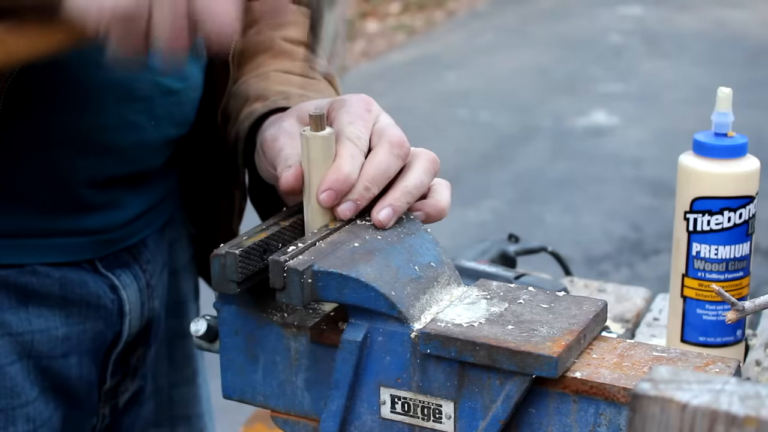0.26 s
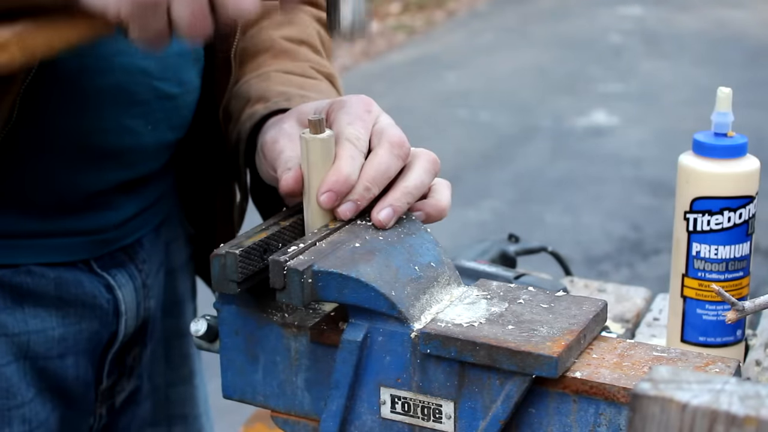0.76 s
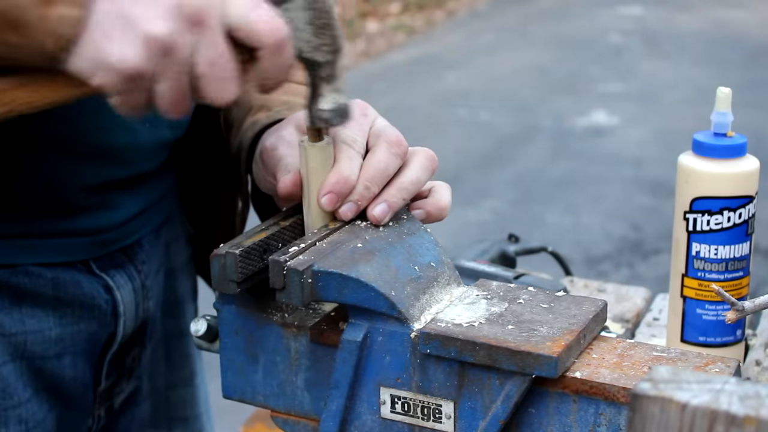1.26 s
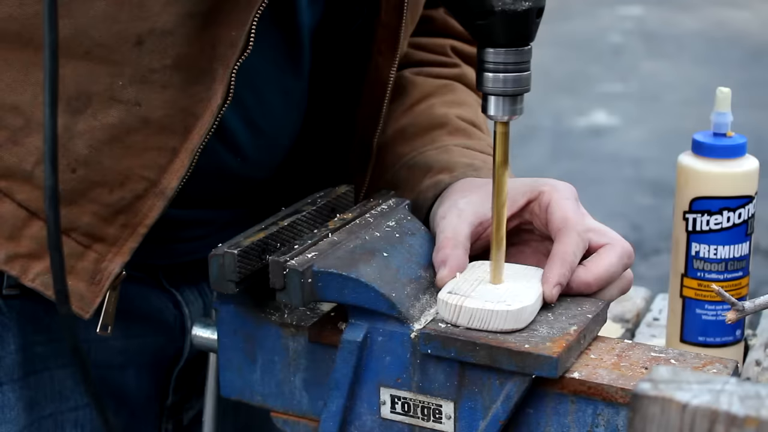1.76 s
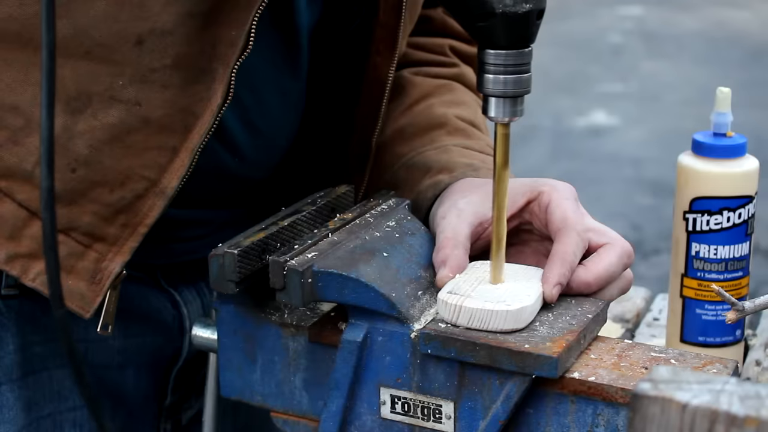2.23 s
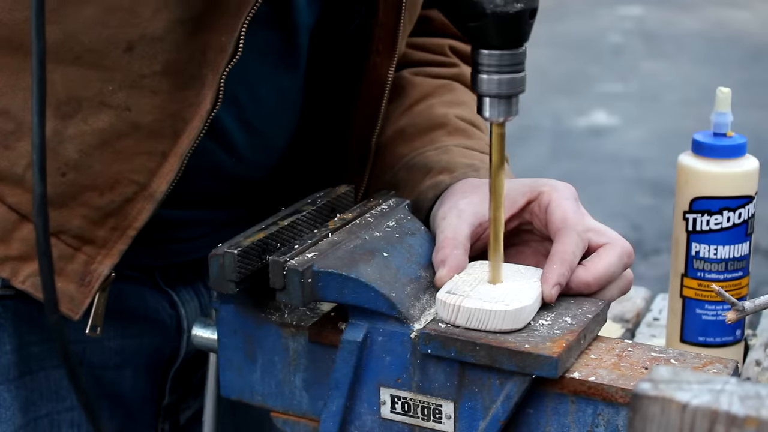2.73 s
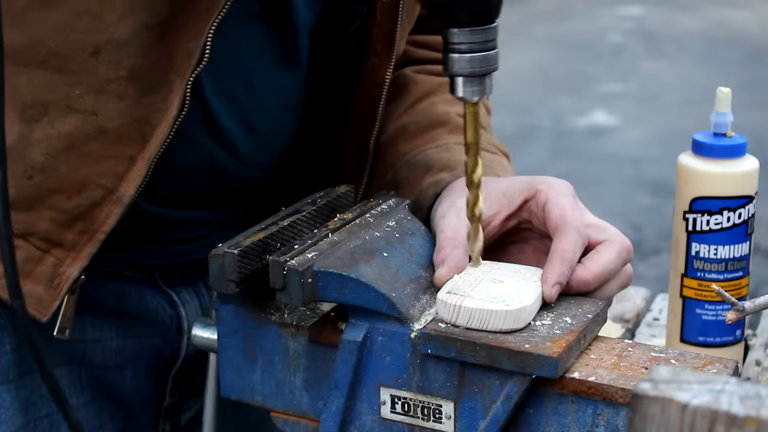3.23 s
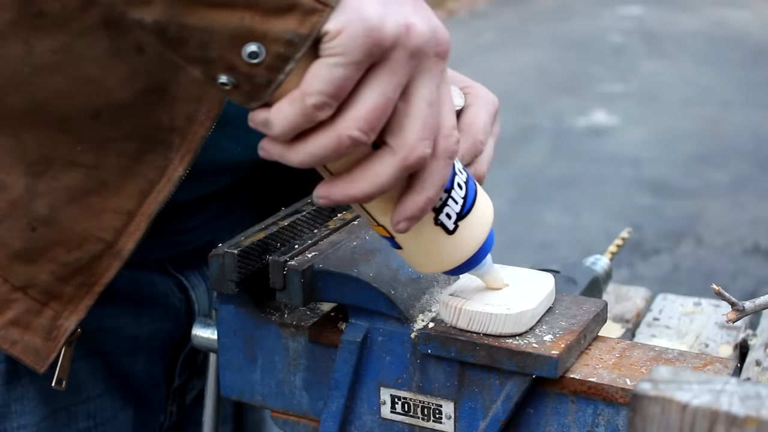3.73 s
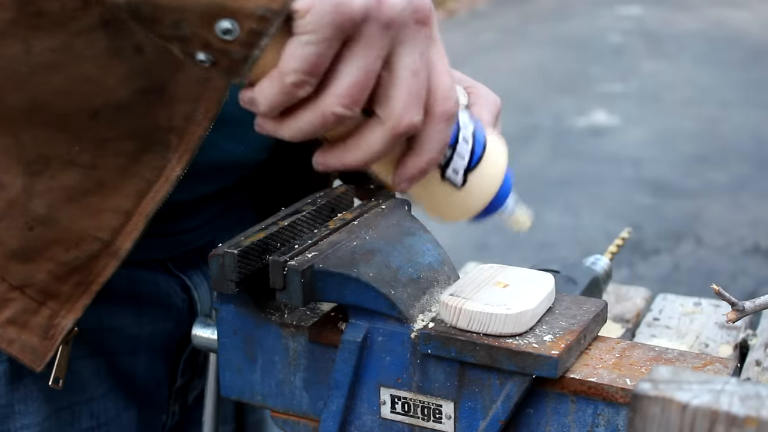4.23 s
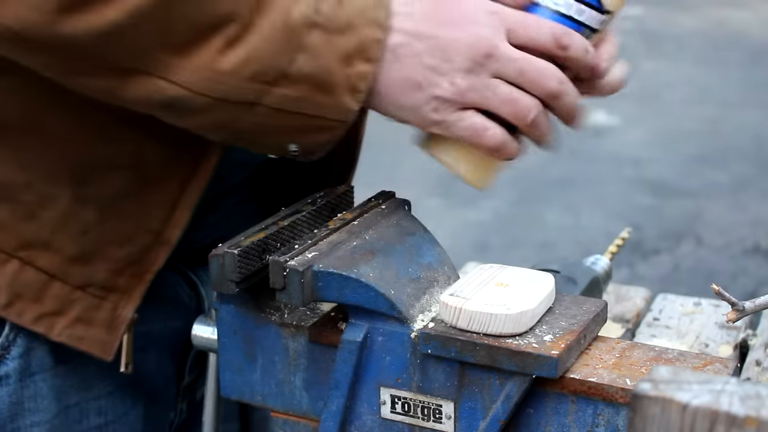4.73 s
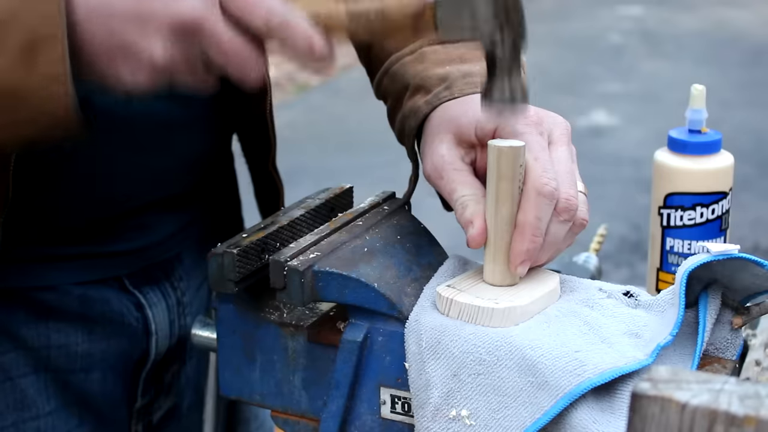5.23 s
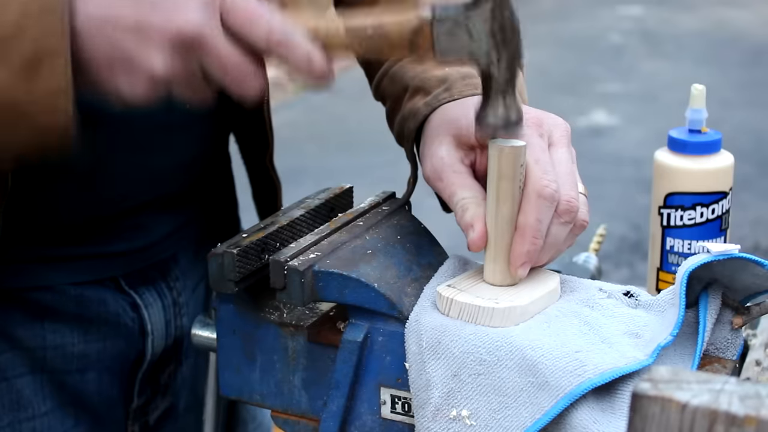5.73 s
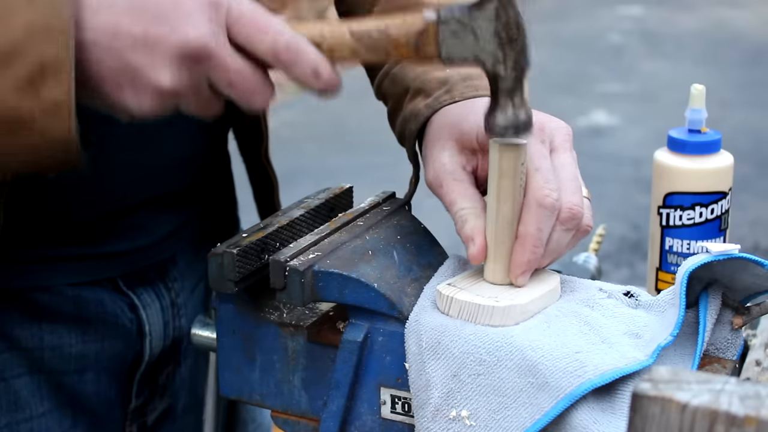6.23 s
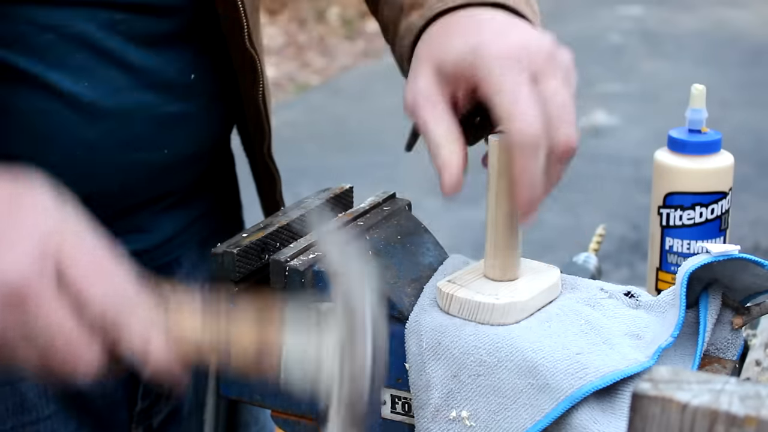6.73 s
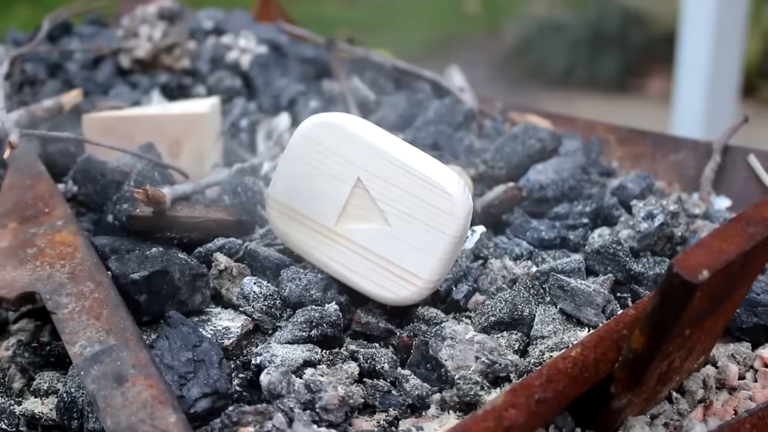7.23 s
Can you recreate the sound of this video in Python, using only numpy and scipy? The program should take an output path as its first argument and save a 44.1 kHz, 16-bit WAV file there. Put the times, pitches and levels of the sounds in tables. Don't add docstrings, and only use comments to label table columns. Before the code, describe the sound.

Outdoor workbench: six crisp hammer taps, an electric drill slowing to a stop, quiet glue handling, five woody blows, then a torch igniting and hissing.

```python
import sys
import numpy as np
from scipy import signal
from scipy.fft import rfft, irfft, next_fast_len
from scipy.io import wavfile
from scipy.ndimage import uniform_filter1d, map_coordinates

SR = 44100
rng = np.random.default_rng(int(sys.argv[2]) if len(sys.argv) > 2 else 0)


def voltage_ratio(decibels):
    exponent = np.asarray(decibels, float) / 20
    return 10 ** exponent


def log_audio(samples):
    frames = np.atleast_2d(samples).T
    limited = np.clip(frames, -1, 1)
    pcm = np.round(limited * 32767).astype(np.int16)
    wavfile.write(sys.argv[1], SR, pcm)


N = 329427

# freq_hz, density_db
TRAFFIC_SPECTRUM = [(59, -38.5), (100, -2), (178, -2.5), (510, -13), (714, -17.5), (935, -22),
                    (2500, -37.5), (3250, -69.5), (5500, -120)]
LEAF_SPECTRUM = [(290, -26.5), (500, -7.5), (925, -4.5), (1610, -3), (1990, -5.5), (3350, -1.5),
                 (4280, -12.5), (8000, -22.5), (10400, -31), (17600, -120)]
HISS_SPECTRUM = [(2350, -38), (4000, -5.5), (6100, -8), (6920, -8), (7510, -5.5), (14800, -7.5),
                 (15900, -9)]
WIND_SPECTRUM = [(12, -36), (20, -7), (43, -4), (86, -8), (120, -4.5), (160, -19), (260, -120)]
PIN_CLATTER = [(180, -20), (300, -17), (1830, -13), (2170, 1), (2470, -9), (3120, -8.5), (3450, -3.5),
               (12600, -40), (15900, -70.5)]
DOWEL_CLATTER = [(88, -39), (150, -3), (264, 2.5), (611, -19), (1210, -9.5), (1690, -16.5), (1970, -14),
                 (3030, -8), (15900, -42.5)]
GROWL_SPECTRUM = [(35, -74), (60, -30), (190, -21), (304, -15), (921, -10), (1950, -4.5), (2140, -11.5),
                  (2500, 1), (3250, -38), (5500, -120)]
RASP_SPECTRUM = [(710, -51), (1200, -17.5), (1940, -2), (2340, -14.5), (2780, -5), (3060, -2), (3670, -6),
                 (5140, -22), (6000, -15.5), (13200, -120)]
FAN_SPECTRUM = [(2650, -22), (4500, -8), (6150, -8.5), (6760, 3), (7010, -2), (7350, -7.5), (8440, -6),
                (10100, -12), (11100, -6.5), (12100, -16), (14300, -15), (15900, -31)]
FLAME_SPECTRUM = [(15, -38), (25, -18), (92, -9), (284, -7), (372, -17.5), (438, -18), (900, -23),
                  (1170, -59), (1980, -120)]
NOZZLE_SPECTRUM = [(290, -19), (500, -12.5), (1110, -12.5), (2170, -4.5), (2750, 0.5), (3080, -0.5),
                   (4630, -9), (6000, -30), (13200, -120)]
JET_SPECTRUM = [(2650, -33), (4500, -14), (5550, -7.5), (8000, -3.5), (8550, 1), (9150, -4), (11600, -4),
                (12500, -2.5), (14700, -4), (15800, -3)]
# freq_hz, side_minus_mid_db
PORTS = [(60, -38), (200, -52), (700, -45.5), (2380, -44), (8120, -34), (15000, -27)]

# start_s, end_s
TAKE_SPANS = [(0, 1.737), (3.36, 3.604), (3.606, 5.14), (5.142, 6.842)]
# traffic_db, leaves_db, hiss_db
TAKE_LEVELS = [
    (-50.5, -52.5, -63.5),
    (-58, -56.5, -69.5),
    (-50.5, -63.5, -66.5),
    (-56, -50.5, -68.5),
]
# time_s, level_db
BREEZE = [
    (0.0, -61),
    (1.56, -59),
    (1.8, -71),
    (2.93, -55.5),
    (3.4, -67),
    (3.8, -50.5),
    (5.16, -68),
    (7.47, -64),
]
# time_s, effort_db
HANDS = [
    (3.606, -61.5),
    (4.25, -59.5),
    (4.5, -51.5),
    (4.64, -55),
    (4.8, -49.5),
    (4.85, -53.5),
    (4.875, -45.5),
    (5.05, -45),
    (5.138, -50),
]
# traffic_db, leaves_db, hiss_db
EFFORT_GROWTH = (0.15, 1.13, .5)
# time_s, level_db
SLEEVE = [
    (4.402, -62),
    (4.706, -53.5),
    (4.81, -51.5),
]

# start_s, peak_db, thud_db, slap_hz, ring_db
PIN_BLOWS = [(0.025, -4.5, -24, 3366, 5.5), (0.311, -27.5, -13, 2920, 9.5), (0.348, -3.5, -28, 1675, 0.5),
             (0.62, -25, -12, 2860, 9), (0.659, -4.5, -24, 3295, 4.5), (0.942, -29, -11, 2920, 9),
             (0.986, -2.5, -28.5, 1820, 2.5), (1.267, -24, -20, 2900, 7.5), (1.275, -26, -11, 3020, -4),
             (1.286, -7, -27.5, 2810, 5), (1.323, -31.5, 2, 1550, 4), (1.576, -25, -14, 2980, 10.5),
             (1.598, -2.5, -38, 1750, -1), (1.634, -27.5, 2.5, 2800, -6)]
DOWEL_BLOWS = [(5.221, -3.5, -22.5, 1880, -2), (5.475, -0.5, -17, 1810, -5), (5.538, -29, -1, 1350, 9),
               (5.591, -30.5, -8, 940, 4), (5.727, -3, -17, 1060, 5), (5.763, -21, -8, 1510, 0),
               (5.813, -26, -3, 1305, 13), (5.986, -2.5, -26, 1595, 2), (6.019, -28.5, -4, 2350, -4),
               (6.046, -37, 3, 1340, 5), (6.071, -31, -6.5, 1355, 14), (6.227, -2, -21, 1060, 4),
               (6.281, -19, -16.5, 1160, -13), (6.314, -33, 1, 616, 14)]
CLICKS = [
    (4.454, -35, -31, 2880, 6),
    (4.701, -26, -15.5, 1500, 0),
    (6.915, -24.5, -20, 1120, 4),
]
# freq_hz, level_db, t60_s
PIN_MODES = [(1154, -16, 0.052), (1580, -20, 0.05), (1880, -29, 0.066), (2500, -7, 0.053),
             (2825, 20, 0.0035), (3480, -5, 0.021), (3530, -25, 0.045), (4160, -22, 0.075),
             (5610, -36, 5.0), (8260, -36.5, 0.08)]
DOWEL_MODES = [(1060, -10.5, 0.3), (1335, 3, 0.046), (1810, 10.5, 0.016), (2350, -3.5, 0.076),
               (2900, -22, 0.028), (3546, -40, 0.026), (5250, -11, 0.021)]
BENCH_MODES = [(134.2, -6.5, 0.16), (285, -21, 0.19), (370, -1.5, 0.074), (455, 3, 0.035),
               (600.3, -2.5, 0.14)]
# freq_hz, t60_s
PIN_DECAY = [(200, 0.16), (1000, 0.043), (3000, 0.029), (8000, 0.012), (15000, 0.0069)]
DOWEL_DECAY = [(200, 0.097), (1000, 0.14), (3000, 0.037), (8000, 0.015), (15000, 0.0058)]
# blow_s, level_db
HEAD_RING = [(.024, -48.5), (.348, -44.5), (.659, -50.5), (.986, -43.5), (1.284, -41), (1.597, -43.5),
             (5.221, -50), (5.476, -51), (5.727, -57.5), (5.985, -43), (6.227, -59.5)]
CLAW_DB = [-21.5, -24, -31, -24, -31, -33]

# time_s, lowest_hz, level_db
TRILL = [
    (1.335, 7500, -57),
    (1.36, 7200, -57.5),
    (1.39, 7050, -48),
    (1.43, 7230, -50),
    (1.47, 7100, -59),
    (1.54, 7100, -69),
]
# time_s, pitch_hz, level_db
CHIP = [
    (3.458, 4530, -68),
    (3.476, 4470, -41),
    (3.488, 4550, -57),
]
INSECTS_DB = (-58.5, -67, -65)
# start_s, end_s
DRONE_S = (3.41, 3.604)

# time_s, turns_per_s, load_db
SHAFT = [(1.739, 207, -4.5), (1.805, 215, -5), (1.95, 232, -2.5), (2.13, 242.5, -1.5), (2.33, 248.5, -1.5),
         (2.57, 249.5, -0.5), (2.62, 242, -2), (2.74, 198, -2.5), (2.86, 170, -4), (3.02, 126, -3),
         (3.18, 81, -2.5), (3.24, 66, -3), (3.3, 55, -2), (3.35, 31, -5.5), (3.44, 12, -13.5)]
# freq_hz, width_hz, level_db
CASING = [(1910, 140, -14), (3040, 110, 10), (6840, 870, -13), (8350, 1300, -7.5)]

# time_s, flow_db
GAS = [
    (6.844, -21),
    (6.86, -7.5),
    (6.904, -17),
    (6.932, -4.5),
    (6.956, 5.5),
    (6.98, 0),
    (7.16, -3),
    (7.26, -4.5),
    (7.35, -1.5),
    (7.47, -2),
]
# time_s, pitch_hz, level_db
POP = [
    (6.844, 283, -38),
    (6.87, 282.5, -33.5),
    (6.97, 276, -45),
]

TOP_HZ = 15950
HARD_DB = -10


def unit(x):
    return x / np.sqrt(np.mean(x ** 2) + 1e-20)


def since(s):
    return np.arange(N) / SR - s


def along(points, hz):
    f, v = np.transpose(points)
    return np.interp(np.log(hz + 1), np.log(f + 1), v)


def curves(*tables):
    t = since(0)
    s, *cols = np.concatenate(tables).T
    gate = sum((t >= rows[0][0]) & (t < rows[-1][0]) for rows in tables)
    smooth_gate = uniform_filter1d(np.minimum(gate, 1.), size=90)
    return [np.interp(t, s, c) for c in cols] + [smooth_gate]


def wobble(rate_hz):
    knots = rng.standard_normal(int(N * rate_hz / SR) + 4)
    return map_coordinates(knots, [np.arange(N) * rate_hz / SR])


def filtered(x, gain):
    m = next_fast_len(N + 8192)
    return irfft(rfft(x, m) * gain(np.fft.rfftfreq(m, 1 / SR)), m)[:N]


def rush(spectrum, patchy_db, beat=1):
    z = signal.stft(rng.standard_normal(N) * beat, nperseg=512)[2]
    field = uniform_filter1d(rng.standard_normal(z.shape), size=6, axis=0)
    field = uniform_filter1d(field, size=10, axis=1)
    x = signal.istft(z * voltage_ratio(patchy_db * unit(field)), nperseg=512)[1][:N]
    return unit(filtered(x, lambda hz: voltage_ratio(along(spectrum, hz)) * np.clip((TOP_HZ - hz) / 250, 0, 1)))


def tone(hz, db, blur=0.):
    phase = 2 * np.pi * np.cumsum(hz) / SR
    return np.sqrt(2) * voltage_ratio(db) * np.sin(phase + blur * wobble(60))


def breeze():
    level_db = curves(BREEZE)[0] + 1.7 * wobble(6.3)
    return voltage_ratio(level_db) * rush(WIND_SPECTRUM, patchy_db=3.0)


def yard():
    open_db, hold_s, close_s = (6.5, 3.5, -3), 0.17, 0.058
    swing_db, swing_delay_s, swing_width_s = (0.5, 1.5, 4.5), (0.17, 0.16), 0.022
    calm_s, calm_db_per_s = 6.64, 45
    spans = [[(a, *db), (b, *db)] for (a, b), db in zip(TAKE_SPANS, TAKE_LEVELS)]
    *still_db, gate = curves(*spans)
    effort_db, handling = curves(HANDS)
    stir_db = handling * (effort_db - min(db for s, db in HANDS))
    stir_db = stir_db - calm_db_per_s * np.maximum(since(calm_s), 0)

    taps = [row[0] for row in PIN_BLOWS if row[1] > HARD_DB]
    drives = [row[0] for row in DOWEL_BLOWS if row[1] > HARD_DB]
    lift = np.max([(since(s) > 0) * np.clip(1 - (since(s) - hold_s) / close_s, 0, 1) for s in taps], axis=0)
    swish = sum(np.exp(-(since(s + delay) / swing_width_s) ** 2 / 2)
                for hits, delay in zip((taps, drives), swing_delay_s) for s in hits)

    traffic_db, leaves_db, hiss_db = (
        db + growth * stir_db + opening * lift + swing * swish
        for db, growth, opening, swing in zip(still_db, EFFORT_GROWTH, open_db, swing_db))
    traffic = voltage_ratio(traffic_db + wobble(16) / 2) * rush(TRAFFIC_SPECTRUM, patchy_db=0.5)
    leaves = voltage_ratio(leaves_db + 0.88 * wobble(8.6)) * rush(LEAF_SPECTRUM, patchy_db=1.6)
    hiss = voltage_ratio(hiss_db + 0.6 * wobble(4.9)) * rush(HISS_SPECTRUM, patchy_db=0.8)
    return gate * (traffic + leaves + hiss)


def ringing(modes, t):
    longest_s, detune, scatter_db = 0.26, 0.008, 2.5
    out = 0
    for hz, db, t60_s in modes:
        envelope = voltage_ratio(db + rng.normal(0, scatter_db) - 60 * t / min(t60_s, longest_s))
        out = out + envelope * np.sin(2 * np.pi * hz * rng.normal(1, detune) * t)
    return out


def blows(events, modes, colour, decay, slap_db, ring_db, clatter_db, thud_db, crack_db, bright):
    out, t = np.zeros(N + SR), np.arange(SR // 4) / SR
    contact = np.exp(-(t / 0.0017) ** 4)
    next_s = [row[0] for row in events[1:]] + [N]
    for (s, peak_db, low_db, slap_hz, mode_db), lands_s in zip(events, next_s):
        free = np.clip((lands_s - s - t) / 0.004 + 1, 0.15, 1)
        soft = np.clip((low_db + 16) / 10, 0, 1)
        top_db = bright[0] + bright[1] * peak_db + bright[2] * low_db

        hz, frame_s, z = signal.stft(rng.standard_normal(len(t)), SR, nperseg=128)
        dull_db = (top_db + 18.5) * np.clip(np.log2(hz / 4000 + 0.01), 0, 1.1)
        fade_db = -60 * frame_s / along(decay, hz)[:, None]
        fade = voltage_ratio(fade_db) + 0.11 * voltage_ratio(0.17 * fade_db)
        z = z * fade * voltage_ratio(along(colour, hz) + dull_db)[:, None]
        clatter = signal.istft(z, SR, nperseg=128)[1][:len(t)]
        chatter_db = 2.7 * np.repeat(rng.standard_normal(len(t) // 150 + 1), 150)[:len(t)]
        hit = voltage_ratio(clatter_db) * voltage_ratio(chatter_db) * clatter / np.abs(clatter).max()

        hit = hit + free * voltage_ratio(ring_db + mode_db) * ringing(modes, t)
        slap = sum(gain * np.cos(2 * np.pi * ratio * slap_hz * t)
                   for ratio, gain in ((0.6, 0.21), (1, 0.62), (1.6, 0.34), (2.7, 0.25)))
        crack_band = signal.butter(2, [5500, 11000], "band", fs=SR)
        crack = signal.lfilter(*crack_band, rng.standard_normal(len(t)))
        hit = hit + (1 - 0.5 * soft) * contact * (voltage_ratio(slap_db) * slap + voltage_ratio(crack_db + top_db) * crack)
        spot = voltage_ratio(mode_db - 21.5 - 60 * t * slap_hz / 150) * np.sin(2 * np.pi * slap_hz * t)
        hit = hit + free * spot
        hit = hit + voltage_ratio(thud_db + low_db) * ringing(BENCH_MODES, t)

        onset = 1 - np.exp(-t / (0.00042 + 0.00049 * soft))
        out[round(s * SR):][:len(t)] += voltage_ratio(peak_db) * hit * onset
    return filtered(out[:N], lambda hz: 1j * hz / (1j * hz + 70))


def singing():
    hold_s, t60_s = 0.16, 0.4
    t, level = since(0), np.zeros(N)
    for s, top_db in HEAD_RING:
        after = slice(round(s * SR), round((s + 0.4) * SR))
        swell_db = np.interp(t[after] - s, [0.006, 0.02, hold_s, hold_s + t60_s], [-28, -4.5, -4, -61.0])
        level[after] = voltage_ratio(top_db + swell_db)
    silent = (t > 1.737) & (t < 5.2)
    return ~silent * level * tone(np.full(N, 5641), 0.6 * wobble(54))


def claw():
    t60_s = 0.52
    level = sum((since(s) > 0) * voltage_ratio(db - 17.0 - 60 * np.abs(since(s)) / t60_s)
                for (s, _), db in zip(HEAD_RING, CLAW_DB))
    return level * tone(np.full(N, 1593), 0, blur=0.08)


def hammer():
    pin = blows(PIN_BLOWS, PIN_MODES, PIN_CLATTER, PIN_DECAY, slap_db=4.5, ring_db=-10.5,
                clatter_db=-3, thud_db=-4.5, crack_db=11.0, bright=(-10, 0.55, 0.01))
    dowel = blows(DOWEL_BLOWS, DOWEL_MODES, DOWEL_CLATTER, DOWEL_DECAY, slap_db=7, ring_db=-23,
                  clatter_db=-4.5, thud_db=1.0, crack_db=13.0, bright=(-36, 0.3, -0.8))
    return pin + dowel + singing() + claw()


def trill():
    hz, db, gate = curves(TRILL)
    swell = np.clip((db + 67.5) / 15, 0, 1)
    call = 0
    for width, loss_db in ((0.012, -6), (0.05, -9), (0.07, -6)):
        flutter_hz = hz * (1 + width * swell * np.abs(wobble(97)))
        call = call + tone(flutter_hz, db + loss_db + 4 * wobble(140), blur=1.3)
    return gate * call


def casing(f_hz):
    gain = sum((-1) ** k * voltage_ratio(db) * 1j * f_hz * width / (centre ** 2 - f_hz ** 2 + 1j * f_hz * width)
               for k, (centre, width, db) in enumerate(CASING))
    return gain * (f_hz < TOP_HZ)


def casing_swell(line_hz):
    return sum(np.exp(-((line_hz - hz) / 330) ** 2) * voltage_ratio(db) for hz, db in ((1900, 11), (2950, 0)))


def drill():
    teeth, slots, bars, gearing, full_turns_per_s = 8, 12, 24, 13.4, 250
    release_s, gears_free_s = 2.585, 2.795
    growl_db, rasp_db, fan_db, gear_db, coast_db, whine_db = -36, -34, -30.5, -35, -46, -22.5
    growl_oct_db, rasp_oct_db, fan_oct_db = 4.5, 2, 9
    idle_db, whine_sag_db_per_s = -4, 7

    speed, load_db, on = curves(SHAFT)
    t, octaves = since(0), np.log2(speed / full_turns_per_s)
    powered = on * np.clip(-since(release_s) / 0.02, 0, 1)
    meshing = on * np.clip(-since(gears_free_s) / 0.14, 0, 1)

    mains = np.cos(2 * np.pi * (60 * t + np.interp(t, [1.74, 2], [0.36, 0.425])))
    cycle = 60 * t + np.interp(t, [1.74, 2], [0.36, 0.425])
    surge = np.exp(5.0 * (np.cos(2 * np.pi * cycle + 0.51 * (mains - 1)) - 1))
    whine_db = whine_db - whine_sag_db_per_s * np.clip(since(SHAFT[0][0]), 0, 0.5)
    whine = powered * tone(slots * speed, whine_db + 7.0, blur=0.1) * surge * voltage_ratio(1.2 * wobble(60.05))

    turns = np.cumsum(speed) / SR
    bit_turns = (turns - turns[round(2.101 * SR)]) / gearing
    rub = np.exp(7.9 * (np.cos(2 * np.pi * bit_turns) - 1))
    chuck = 1 + 1.2 * meshing * rub * voltage_ratio(load_db)
    turns = turns - turns[round(3.3635 * SR)] + 0.04 * wobble(90)
    tick = voltage_ratio(-14 * (turns % 1))
    knocks = (np.diff(np.floor(turns), prepend=0) == 1) * voltage_ratio(3.0 * rng.standard_normal(N))

    rasp_db = rasp_db + rasp_oct_db * octaves + 1.33 * load_db + idle_db * (1 - powered)
    growl_db = growl_db + growl_oct_db * octaves + 0.99 * load_db
    fan_db = fan_db + fan_oct_db * octaves + load_db
    noise = voltage_ratio(growl_db) * rush(GROWL_SPECTRUM, 0.68, chuck * (1 + 0.33 * powered * surge))
    noise = noise + voltage_ratio(rasp_db + 6.0) * rush(RASP_SPECTRUM, 1.7, tick * chuck)
    noise = noise + voltage_ratio(fan_db) * rush(FAN_SPECTRUM, 1.0, (1.3 + tick) * chuck ** 0.84)
    noise = noise + (1 - powered) * filtered(voltage_ratio(rasp_db + 37.5) * knocks, casing)

    glide = 0
    for per_turn, db in ((bars, coast_db), (slots, coast_db - 11)):
        line_hz = per_turn * speed
        gain = (0.76 + casing_swell(line_hz)) * np.clip(line_hz / 350 - 4, 0, 1)
        line = tone(line_hz, db + 2 * wobble(150), blur=0.8)
        glide = glide + gain * line * (1 + 0.49 * wobble(110))
    glide = glide * (1 - powered) * on * (0.3 + tick)
    mesh = meshing * chuck * tone(teeth * speed, gear_db + 1.2 * load_db - 2.5, blur=0.22)
    return on * noise + whine + glide + mesh


def insects():
    gate = curves([(s,) for s in DRONE_S])[0]
    drones = 0
    for db, (centre_hz, half_hz) in zip(INSECTS_DB, ((3330, 420), (4300, 300), (1200, 400))):
        band = [(centre_hz - half_hz, -40), (centre_hz, 0), (centre_hz + half_hz, -40)]
        drones = drones + voltage_ratio(db) * rush(band, 0, voltage_ratio(4.8 * wobble(110)))
    return gate * drones


def chip():
    hz, db, gate = curves(CHIP)
    return gate * tone(hz * (1 + 0.025 * wobble(300)), db, blur=1.4)


def sleeve():
    brush_s = 0.02
    level = sum(voltage_ratio(db) * np.exp(-(since(s) / brush_s) ** 2) for s, db in SLEEVE)
    return level * rush(HISS_SPECTRUM, 1.3, voltage_ratio(3 * wobble(200)))


def clicks():
    return blows(CLICKS, DOWEL_MODES, DOWEL_CLATTER, PIN_DECAY, slap_db=2.5, ring_db=-20.5,
                 clatter_db=-3, thud_db=-1.5, crack_db=-6.0, bright=(-24, 0.01, 0.01))


def torch():
    light_s, open_s, burst_s, flutter_t60_s = 6.845, 6.915, 6.955, 0.59
    flame_db, steady_db, nozzle_db, jet_db, shut_db, ridge_db = -29.5, -45.5, -29, -24, -30, -34
    pilot_hz, open_hz = 3030, 2680
    flow_db, on = curves(GAS)
    flow, opened = wobble(25), np.clip(since(open_s) / 0.022, 0, 1)

    flutter = np.clip(since(light_s) / 0.012, 0, 1) * (since(burst_s) < 0)
    flutter = flutter * voltage_ratio(flame_db - 60 * np.abs(since(light_s)) / flutter_t60_s)
    flame = (flutter + voltage_ratio(steady_db + flow_db)) * voltage_ratio(-5 + 1.3 * wobble(40))
    flame = flame * rush(FLAME_SPECTRUM, patchy_db=4.5)
    nozzle_db = nozzle_db + flow_db - 1.5 + 0.5 * flow
    nozzle = voltage_ratio(nozzle_db) * rush(NOZZLE_SPECTRUM, 2.8, voltage_ratio(0.5 * wobble(400)))
    jet_db = jet_db + 0.56 * flow_db + shut_db * (1 - opened) + flow / 2
    jet = voltage_ratio(jet_db) * rush(JET_SPECTRUM, 1.1, voltage_ratio(0.63 * wobble(600)))

    whistle_hz = pilot_hz + (open_hz - pilot_hz) * opened + 40 * wobble(12)
    whistle_db = ridge_db + 1.57 * flow_db + 12 * (1 - opened) - 1.0
    whistle = wobble(350) * tone(whistle_hz, whistle_db)
    pop_hz, pop_db, popping = curves(POP)
    return on * (flame + nozzle + jet + whistle) + popping * tone(pop_hz, pop_db, blur=0.93)


def scene():
    mono = breeze() + yard() + hammer() + trill() + drill()
    mono = mono + insects() + chip() + sleeve() + clicks() + torch()
    return np.array([mono, mono])


def band_limit(x):
    return signal.sosfilt(signal.butter(12, 17080, fs=SR, output="sos"), x)


def record(dry):
    clip_level, band_hz = 0.61, 17000
    mid = dry[0] / (1 + np.abs(dry[0] / clip_level) ** 6) ** (1 / 6)
    mid = filtered(mid, lambda hz: np.clip((band_hz - hz) / 600, 0, 1))
    side = filtered(mid * wobble(300), lambda hz: voltage_ratio(along(PORTS, hz) + 3))
    return band_limit(np.array([mid + side, mid - side]))


dry = scene()
out = record(dry)
log_audio(out)
```